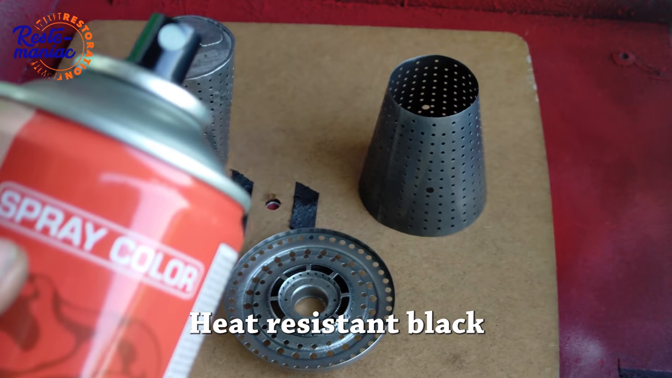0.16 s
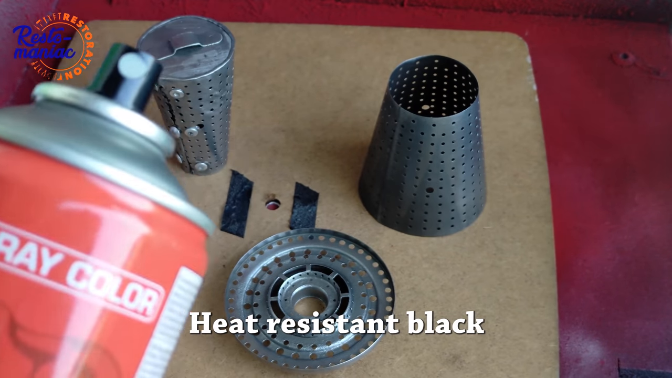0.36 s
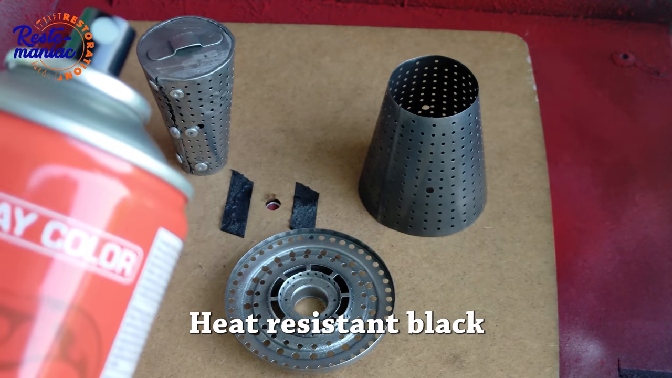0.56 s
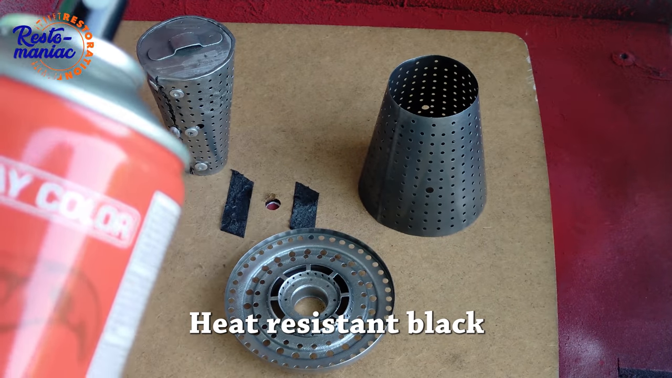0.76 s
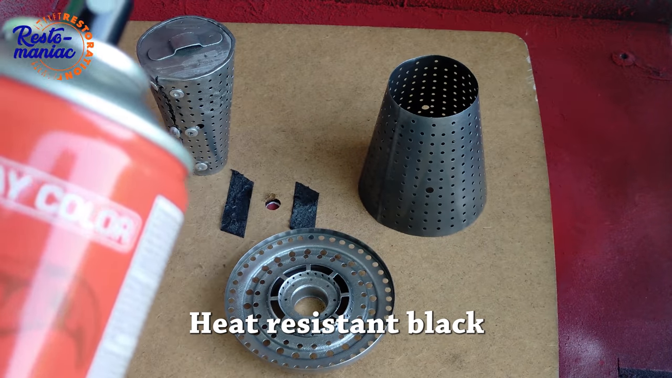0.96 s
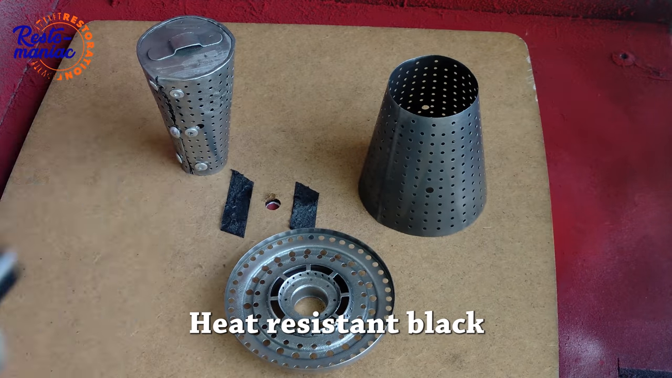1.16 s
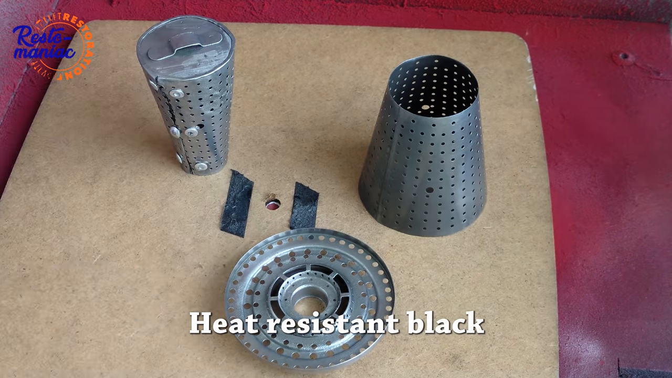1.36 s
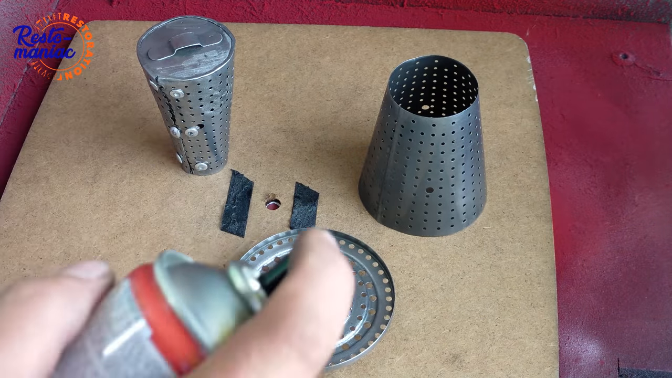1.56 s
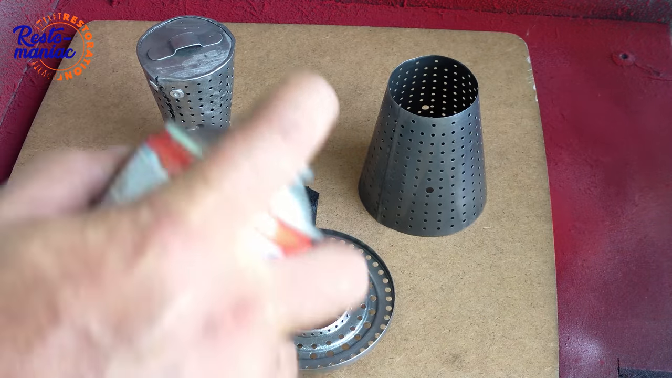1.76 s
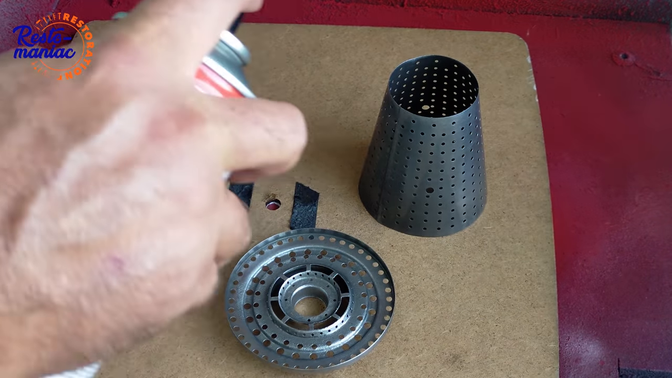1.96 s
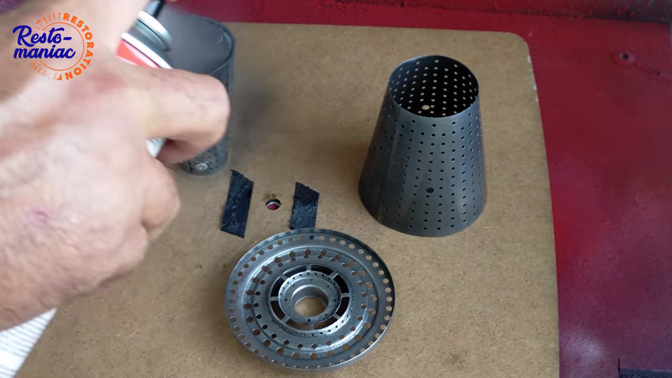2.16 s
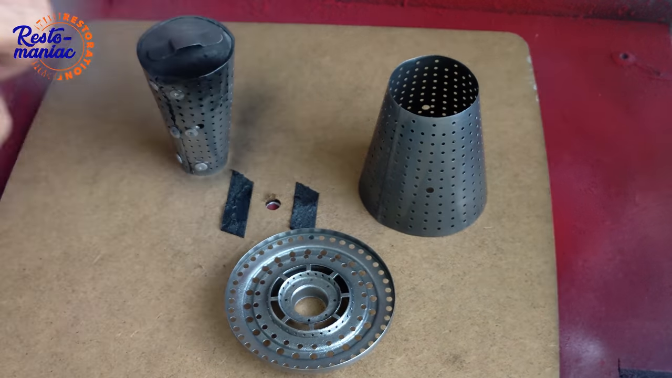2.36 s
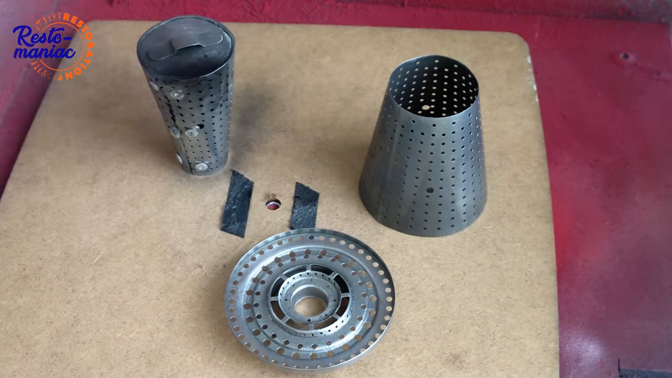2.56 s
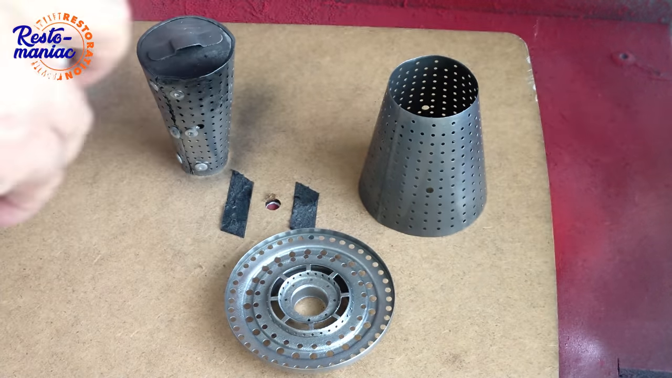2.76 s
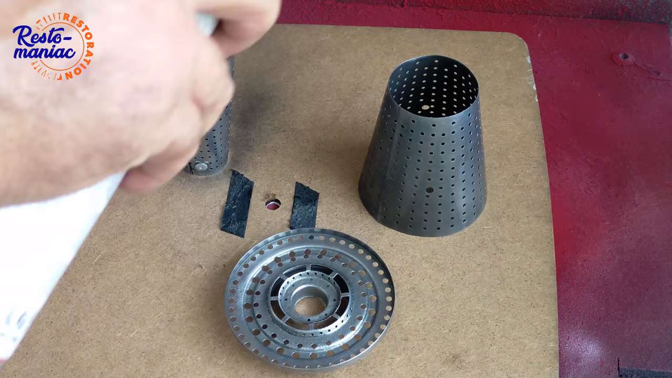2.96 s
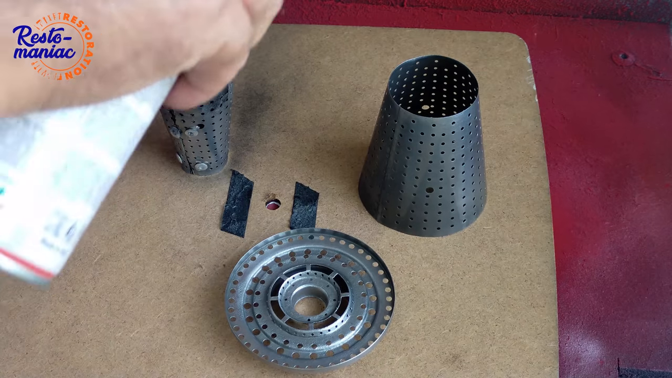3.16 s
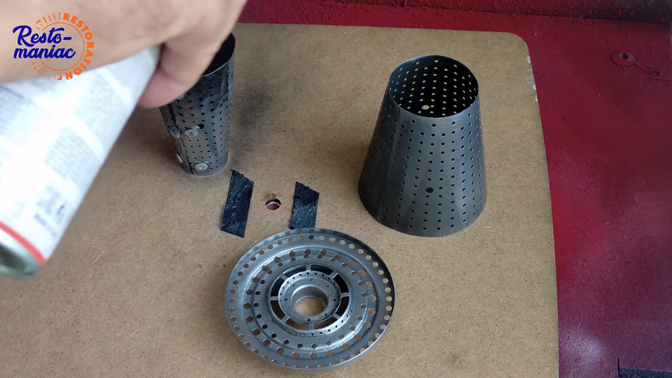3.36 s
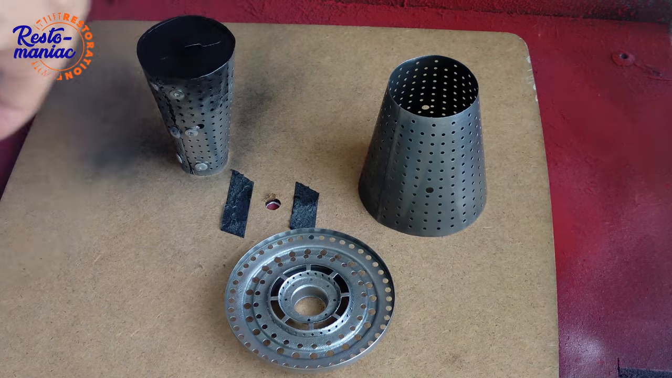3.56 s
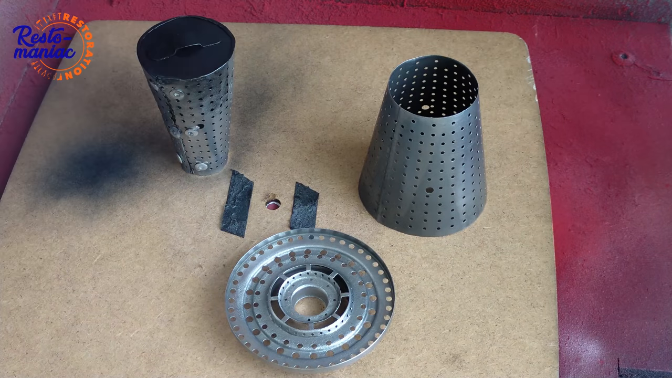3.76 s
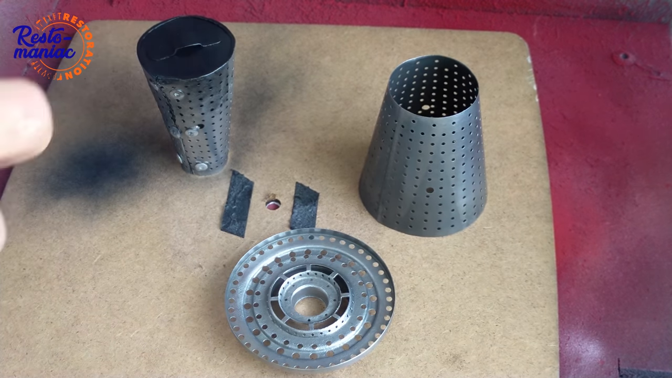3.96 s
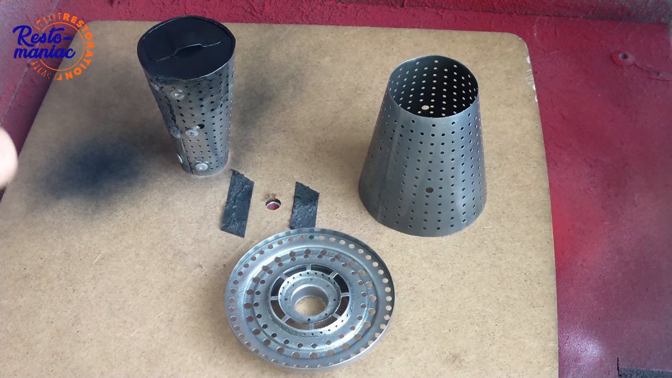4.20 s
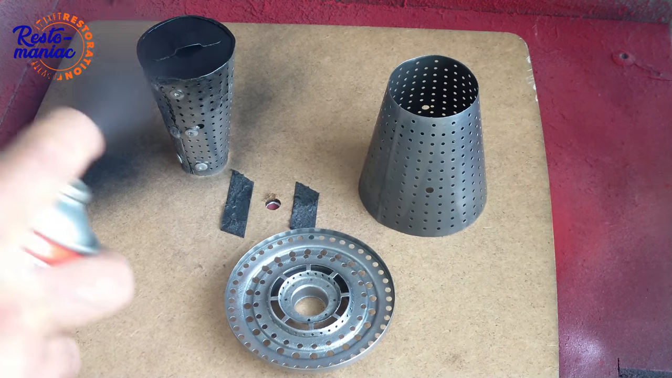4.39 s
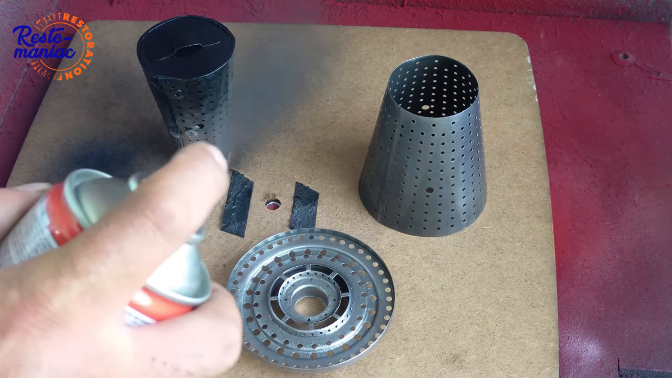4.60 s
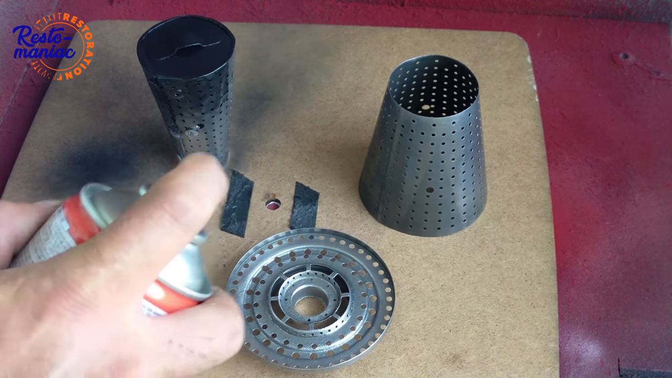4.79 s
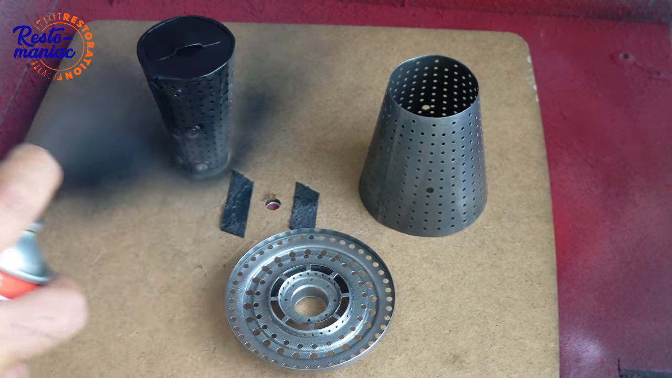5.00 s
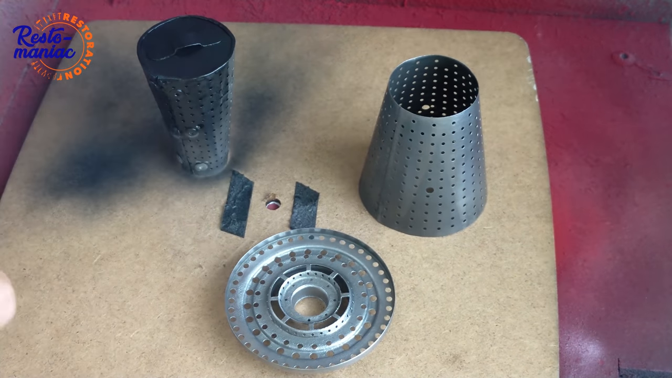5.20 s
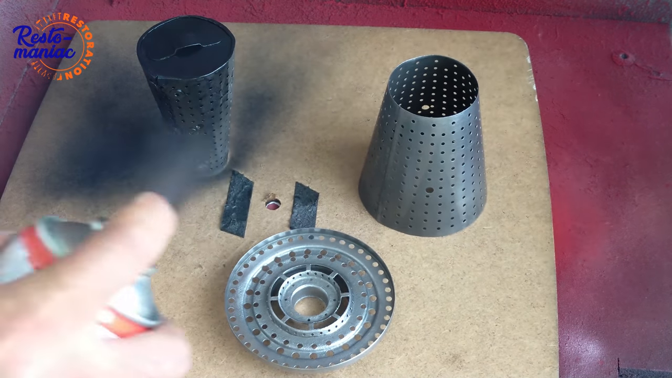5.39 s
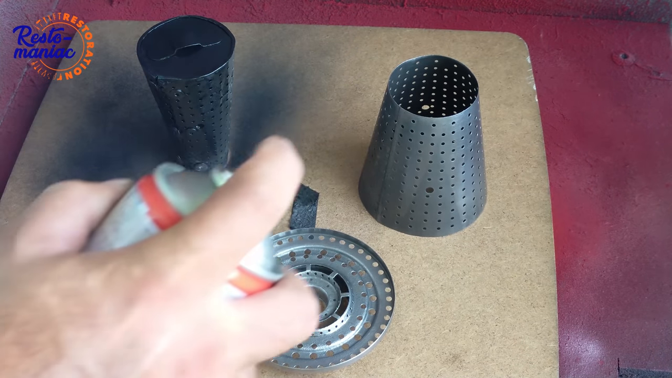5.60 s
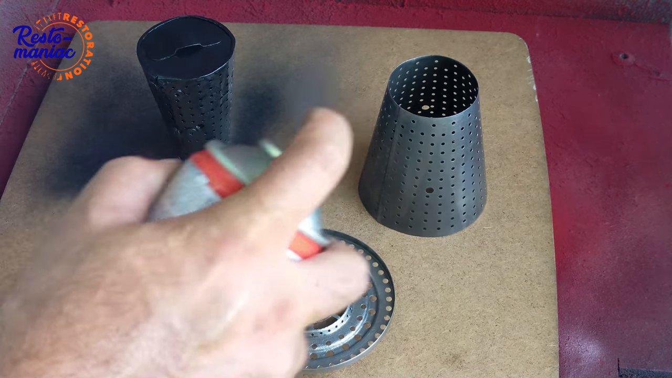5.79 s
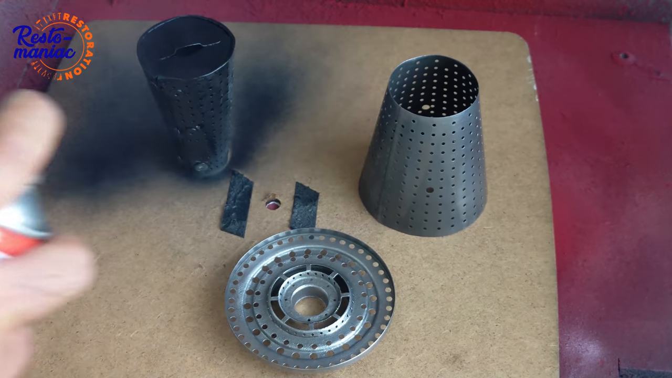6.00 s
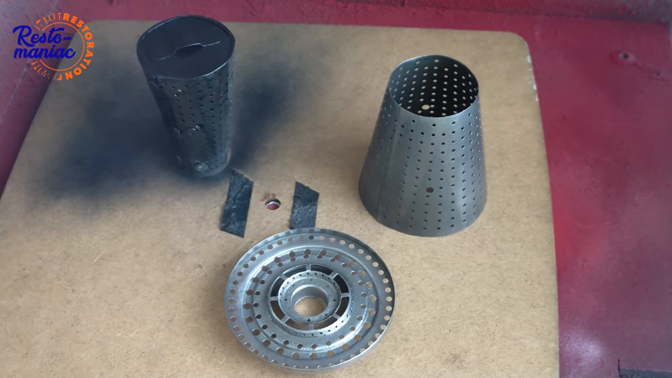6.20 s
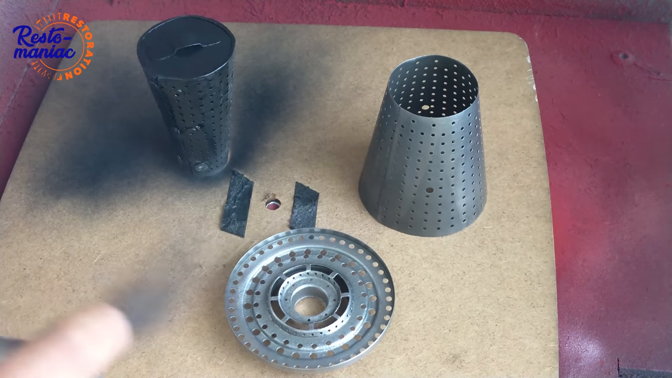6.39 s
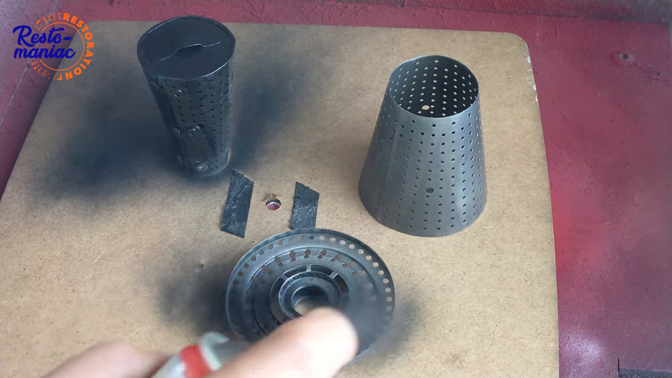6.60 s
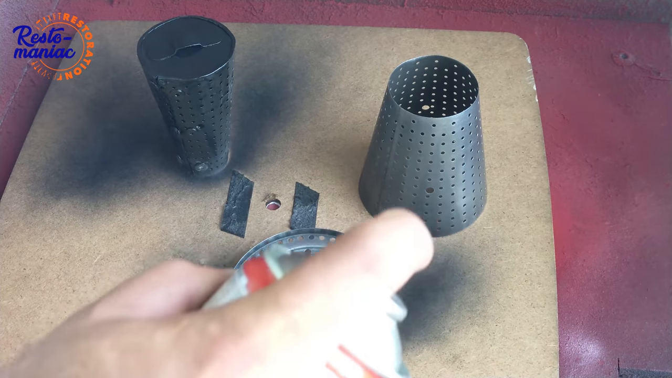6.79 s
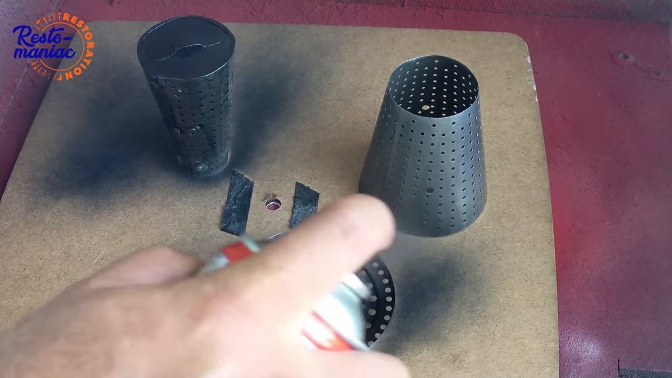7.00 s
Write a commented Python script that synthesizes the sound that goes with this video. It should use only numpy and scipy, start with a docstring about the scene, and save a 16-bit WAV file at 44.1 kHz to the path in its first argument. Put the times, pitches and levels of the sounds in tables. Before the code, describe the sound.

A small quiet workshop, heard closely by one microphone, centred, with only a short touch of room reflection. For the first two seconds there is just soft hiss and low rumble, a barely audible tick at 0.4 and a light can knock with hand movement near 1.5. From 2.0 to 2.45 the can tips and its ball rattles, a bright metallic clack at about 2.17 followed by smaller ones. Crisp spray bursts of 0.25 to 0.4 seconds start near 2.55, 3.2 and 3.8: sharp high hiss over a breathy rush, slightly hollow against metal, ending in faint fizz. Small can clicks come around 4.2 to 4.4. More bursts follow at 4.7, 5.25, 5.7, 6.2 and 6.8. Around 6.1 fingers and sleeve rub and a very thin gas whistle glides upward; soft low bumps come at 6.3 and 7.0.

```python
"""A small workshop: an aerosol can is tipped and its mixing ball rattles; eight short bursts hit metal parts.
Each press gates turbulent noise: a jet hisses high, its plume rushes lower, and delayed echoes colour both.
Metal parts resonate under the plume; decaying pops fizz after release, and a thin gas whistle glides up once.
Knocks excite damped modes of the can. Rubbing noise, bumps and stirred air follow the hand and arm,
over a quiet room hiss and rumble; one microphone feeds both channels."""
import sys
import numpy as np
from scipy import signal
from scipy.fft import rfft, irfft, next_fast_len
from scipy.io import wavfile
from scipy.ndimage import uniform_filter1d, map_coordinates

SR = 44100
rng = np.random.default_rng(int(sys.argv[2]) if len(sys.argv) > 2 else 0)


def persist_wave(psi):
    """Save psi, clipped to +-1, as 16-bit WAV."""
    counts = np.round(np.clip(psi, -1, 1) * 32767).astype(np.int16)
    wavfile.write(sys.argv[1], SR, np.atleast_2d(counts).T)


N = 310905
TIME = np.arange(N) / SR  # s


def undb(db):
    """Logarithmic level law: 20 dB is a factor of ten in amplitude."""
    return 10 ** (np.asarray(db) / 20)


def unit(x):
    """Normalisation of the root-mean-square amplitude to 1."""
    return x / np.sqrt(np.mean(x ** 2))


def colour(x, points, tilt_db=0):
    """Spectral shaping: (f/Hz, level/dB) points plus a tilt in dB per octave weight the spectrum; rms 1."""
    hz, db = np.transpose(points)
    point_octaves = np.log2(hz)
    octave = np.log2(np.maximum(np.fft.rfftfreq(len(x), 1 / SR), 1))
    level = np.interp(octave, point_octaves, db)
    level = level + tilt_db * np.maximum(octave, point_octaves[0])
    return unit(irfft(rfft(x) * undb(level), len(x)))


def noise(points):
    """Stationary random noise with the given spectrum."""
    return colour(rng.standard_normal(next_fast_len(N)), points)[:N]


def walk(rate):
    """Slow random modulation: levels held 1 / rate s and smoothed twice; rms 1."""
    size = max(int(SR / rate), 1)
    held = np.repeat(rng.standard_normal(N // size + 1), size)
    return unit(uniform_filter1d(uniform_filter1d(held, size), size)[:N])


def droplets(points, rate, spread_db):
    """Shot noise: tiny random impulses of uneven size, rate a second on average."""
    size = next_fast_len(N)
    pops = (rng.random(size) < rate / SR) * rng.standard_normal(size)
    sizes = undb(spread_db * np.minimum(rng.exponential(size=size), 4))
    return colour(pops * sizes, points)[:N]


def resonance(x, hz, width):
    """Resonance: two passes through one band-pass, each width Hz wide, select a pitch; rms 1."""
    b, a = signal.iirpeak(hz, hz / width, fs=SR)
    return unit(signal.lfilter(b, a, signal.lfilter(b, a, x)))


# presses of the valve; jet, plume and spit levels are relative, before the gains in spray:
# t/s, length/s, opening time/s, jet level/dB, jet change over the burst/dB,
# plume level/dB, plume change/dB, first spit/dB
PRESSES = [(2.552, 0.41, 0.049, -32.5, 5, -52, 3.5, 4), (3.189, 0.36, .036, -31.5, 8.5, -51, 9.5, 6),
           (3.823, .36, 0.045, -36.5, 2, -57, 4, 6.5), (4.702, 0.39, 0.075, -33.5, 3.5, -49.5, 5, 3),
           (5.261, 0.29, 0.058, -30.5, 1.5, -49, -4, 4.5), (5.717, 0.28, 0.041, -29, 0, -47, 2, 2),
           (6.203, 0.23, 0.043, -32.5, -1.5, -51, -2, 5.5), (6.784, .33, 0.055, -31, 3, -48, 1.5, 1)]
SPIT_S, SPIT_JET_SHARE = 0.02, 0.56  # paint waiting in the stem swells the plume more than the jet
EASE_S, EASE_JET_DB, EASE_PLUME_DB = 0.05, -7.5, -4.5  # the finger eases off before the valve shuts
SHUT_T60_S = 0.044


def valve_flow():
    """Flow modulation: each press opens, spits, drifts as the can sweeps, eases and decays; jet, plume gains."""
    jet, plume = np.zeros(N), np.zeros(N)
    for s, length, open_s, jet_db, jet_change_db, plume_db, plume_change_db, spit_db in PRESSES:
        age = TIME - s
        opened = np.clip(age / open_s, 0, 1)
        shutting = undb(-60 * np.maximum(age - length, 0) / SHUT_T60_S)
        valve = np.sin(np.pi / 2 * opened) ** 2 * np.sqrt(opened) * shutting
        sweep = np.clip(age / length, 0, 1) - .5
        spit = spit_db * np.exp(-((age - open_s) / SPIT_S) ** 2)
        ease = np.clip(1 + (age - length) / EASE_S, 0, 1)
        jet_level = jet_db + jet_change_db * sweep + SPIT_JET_SHARE * spit + EASE_JET_DB * ease
        plume_level = plume_db + plume_change_db * sweep + spit + EASE_PLUME_DB * ease
        jet += valve * undb(jet_level)
        plume += valve * undb(plume_level)
    return jet, plume


def off_board(x, echo_db=-12, count=10):
    """Comb interference: weak echoes off board, parts and bench; moving can and gas shift their lags."""
    out = x
    for lag_s in np.geomspace(.0007, .011, count) * rng.uniform(.85, 1.15, count):
        lag = (lag_s + .00014 * walk(5.5)) * SR  # samples
        out = out + undb(echo_db) * map_coordinates(x, [np.arange(N) - lag], order=5)
    return out / np.sqrt(1 + count * undb(echo_db) ** 2)


# nozzle hiss: f/Hz, relative density level/dB
JET_SPECTRUM = [(3000, -45), (5400, -26), (6500, -19), (7400, -18), (8250, -9.5), (9200, -15),
                (10500, -11.5), (12500, -9), (14000, -5.5), (15000, -1.5), (15650, 1.5)]
# plume of paint and gas: f/Hz, relative density level/dB
PLUME_SPECTRUM = [(100, -36), (200, -10), (320, -10.5), (520, -9.5), (800, -6.5), (1350, -5), (1600, -5.5),
                  (2200, -0.5), (2900, -2.5), (4300, -1), (5200, -12.5), (8000, -2.5), (15000, -39)]


def spray(jet_db=1, drops_db=-9.5, waver_db=0.4, flutter_db=0.91, sputter_db=1.0):
    """Turbulent jet noise: hiss, droplet pops and plume share a flow that wavers, flutters and sputters."""
    jet_gain, plume_gain = valve_flow()
    flow = undb(waver_db * walk(22) + flutter_db * walk(45) + sputter_db * walk(400))
    hiss = noise(JET_SPECTRUM)
    jet = hiss + undb(drops_db) * droplets(JET_SPECTRUM, rate=3600, spread_db=-0.5)
    plume = plume_gain * noise(PLUME_SPECTRUM)
    return off_board(flow * (undb(jet_db) * jet_gain * jet + plume))


def swells(table, grain_db):
    """Resonance under noise excitation: narrow bands swell and fade with a rough grain."""
    out, grain = np.zeros(N), undb(grain_db * walk(120))
    for s, length, db, hz, width in table:
        swell = np.sqrt(np.abs(np.sin(np.pi * np.clip((TIME - s) / length, 0, 1))))
        out += undb(db) * swell * grain * resonance(rng.standard_normal(N), hz, width)
    return out


# plume blowing into the hollow metal parts: t/s, length/s, level before grain/dB, f/Hz, filter width/Hz
HOLLOW_PARTS = [(2.58, 0.042, -57, 1730, 400), (3.34, 0.16, -60.5, 1365, 220),
                (4.92, 0.18, -60.5, 2370, 700), (5.29, 0.24, -64, 1280, 200), (5.87, 0.15, -57, 2260, 500),
                (6.24, 0.2, -57, 2350, 600), (6.88, 0.16, -62, 2150, 500)]


def hollow_parts():
    """Cavity resonance: the plume's rough air sounds the hollow metal parts."""
    return swells(HOLLOW_PARTS, grain_db=4.5)


# liquid left in the nozzle: f/Hz, relative density level/dB
FIZZ_SPECTRUM = [(300, -12), (1000, 1), (2000, -6), (2500, 5), (3100, -5), (5400, -9), (7000, -4.5),
                 (8300, 4), (9300, -7), (13000, -6), (15600, 0.5)]
# gas whistling thinly past the valve: t/s, f before wobble/Hz, level/dB
WHISTLE_GLIDE = [(6.06, 8500, -86), (6.11, 9100, -75), (6.16, 9850, -77), (6.2, 10150, -70),
                 (6.23, 10150, -80)]


def nozzle(fizz_db=-64, t60=0.97, pops_db=-5):
    """Exponential decay: noise and pops fizz out after each release; one wobbling gas tone glides up."""
    dying = 0
    for s, length, *_ in PRESSES:
        age = TIME - s - length
        dying = dying + (age > 0) * undb(-60 * np.abs(age) / t60)
    pops = droplets(FIZZ_SPECTRUM, rate=1500, spread_db=6.0)
    fizz = unit(noise(FIZZ_SPECTRUM) + undb(pops_db) * pops)
    s, hz, db = np.transpose(WHISTLE_GLIDE)
    pitch = np.interp(TIME, s, hz) * (1 + .014 * walk(900))
    whistle_gain = undb(np.interp(TIME, s, db, left=-np.inf, right=-np.inf))
    whistle = np.sin(2 * np.pi * np.cumsum(pitch) / SR) * whistle_gain
    return undb(fizz_db) * dying * fizz + whistle


# knocks and ticks of the can and its ball: t/s, level of the wall noise before its crack and high-pass/dB,
# brightness/(dB per octave), t60/s, hollow body relative to that level/dB
CAN_KNOCKS = [(0.412, -79, 2, .06, -20), (1.488, -64, -3, 0.25, -3.5), (2.041, -63, 0, 0.12, -20),
              (2.163, -41, -2.5, 0.035, 3.5), (2.175, -29, 3.1, 0.083, -15.5), (2.2457, -44, 0, 0.056, -13),
              (2.253, -41.5, 0, 0.089, -9.5), (2.3462, -41.5, -1, 0.056, -1.5),
              (2.3698, -48, -1, 0.073, -14), (2.44, -55, -1, 0.066, -5), (4.232, -62.5, 6, 0.07, -20),
              (4.405, -62, -1, .1, -14), (4.418, -50, 4, 0.098, -14), (6.702, -69.5, 4, 0.46, -18)]
# dense ring of the filled can: f/Hz, relative density level before the brightness tilt/dB
WALL_SPECTRUM = [(200, -29.5), (560, -49), (850, 0.5), (1400, -6), (2600, -3), (3400, -7.5), (4100, 1),
                 (4500, -5), (6000, -5), (8200, 3), (9500, -5.5), (13000, -8.5), (15600, -7)]
# clearest modes of the can: f/Hz, relative level before tilt and common mode gain/dB, t60/s
WALL_MODES = [(952, -7, 0.049), (1884, -0.5, 0.11), (2200, -9.5, 0.13), (3170, -5.5, 0.069),
              (3600, 0.5, 0.093), (3530, -19, 0.05), (7860, -13, 0.047), (7980, 6, 0.053), (8530, 6, 0.047)]


def rattle(modes_db=-10, crack_db=1, crack_t60=0.0017, low_hz=680):
    """Modal excitation: each blow cracks, then the can's wall rings; harder contact is brighter."""
    out, t = np.zeros(N + SR), np.arange(SR // 2) / SR
    for s, db, tilt_db, t60, _ in CAN_KNOCKS:
        decay = undb(-60 * t / t60) + undb(crack_db) * undb(-60 * t / crack_t60)
        wall = colour(rng.standard_normal(len(t)), WALL_SPECTRUM, tilt_db) * decay
        ring = np.zeros(len(t))
        for hz, mode_db, life in WALL_MODES:
            mode_gain = undb(mode_db + tilt_db * np.log2(hz / 5000) - 60 * t / life)
            ring += mode_gain * np.sin(2 * np.pi * (hz * t + rng.random()))
        start = int(s * SR)
        out[start:start + len(t)] += undb(db) * (wall + undb(modes_db) * ring)
    # so small a can radiates almost no bass
    return signal.sosfilt(signal.butter(4, low_hz, "high", fs=SR, output="sos"), out[:N])


def workshop(x, wet_db=-16, t60=0.22):
    """Reverberation: near walls add a short diffuse tail of almost flat spectrum."""
    t = np.arange(SR // 2) / SR
    diffuse = colour(rng.standard_normal(len(t)), [(1000, 0.004), (16000, 0.0054)])
    tail = diffuse * undb(-60 * t / t60) * (t > .005)
    return x + undb(wet_db) * signal.fftconvolve(x, tail / np.linalg.norm(tail))[:N]


def thuds(hits, hz):
    """Damped resonance: blows (t/s, level/dB, t60/s) gate one broad band of noise, then decay."""
    gain = np.zeros(N)
    for s, db, t60 in hits:
        age = np.maximum(TIME - s, 0)
        onset = np.minimum(age * hz / 2, 1)  # two periods
        gain += undb(db - 60 * np.minimum(age / t60, 2)) * onset
    return gain * resonance(rng.standard_normal(N), hz, hz / 3)


# hollow body of the can: f/Hz, relative level/dB, t60 as a multiple of the knock's
BODY_MODES = [(956, -10, 1.2), (1980, -7, 1.2), (3160, 0, .8), (3650, -4.5, .7)]


def can_body():
    """Cavity resonance: every knock also sounds the hollow of the can, some far more than others."""
    out = np.zeros(N)
    for hz, mode_db, life in BODY_MODES:
        hits = [(s, db + hollow_db + mode_db, t60 * life) for s, db, _, t60, hollow_db in CAN_KNOCKS]
        out += thuds(hits, hz)
    return out


# movements of the arm: start t/s, length/s, rustle level before unevenness/dB,
# stirred air level before the rumble gain in background/dB
ARM_MOVES = [(1.473, 0.36, -70, -72), (2.198, 1, -73, -68), (3.0, 0.21, -68, -66.5),
             (3.203, 1, -74.5, -68.5), (4.166, 0.46, -68, -67.5), (5.13, 1.0, -69.5, -62.5),
             (6.038, 0.3, -63.5, -63), (6.252, 0.21, -57.5, -69), (6.402, 0.37, -68, -63.5),
             (6.928, .13, -63, -72)]
HOLD_DB, STILL_AIR_DB = -87.5, -74.5  # resting levels, before those same later gains
MOVE_SKEW = 0.62  # under 1: a movement peaks before its middle


def arm():
    """Addition of powers: each movement swells and fades above rest; gains of rustle and rumble."""
    rustle, air = undb(HOLD_DB) ** 2, undb(STILL_AIR_DB) ** 2
    for s, length, rustle_db, air_db in ARM_MOVES:
        swell = np.sin(np.pi * np.clip((TIME - s) / length, 0, 1) ** MOVE_SKEW) ** 2
        rustle = rustle + swell * undb(rustle_db) ** 2
        air = air + swell * undb(air_db) ** 2
    return np.sqrt(rustle), np.sqrt(air)


# skin and sleeve: f/Hz, relative density level/dB
RUSTLE_SPECTRUM = [(30, -3.5), (70, -7.5), (140, -3.5), (200, -2), (280, -8.5), (380, -3), (520, -8),
                   (900, -8), (2300, -11.5), (5000, -23), (8300, -22), (15000, -24)]


def handling(gain, uneven_db=1.67):
    """Friction noise: skin and cloth rub unevenly as the arm moves."""
    return noise(RUSTLE_SPECTRUM) * gain * undb(uneven_db * walk(35))


# fingers and sleeve rubbing in short slips: t/s, length/s, level before grain/dB, f/Hz, filter width/Hz
RUB_SLIPS = [(0.263, 0.084, -83.5, 2960, 600), (1.112, 0.065, -80.5, 2980, 500),
             (1.927, 0.11, -77.5, 1930, 500), (3.035, .085, -73, 1090, 600), (6.063, 0.099, -63, 910, 400),
             (6.068, 0.08, -63, 1740, 260), (6.075, 0.085, -66.5, 2650, 450), (6.075, 0.2, -73, 3090, 280)]


def rubs():
    """Friction-excited resonance: short slips of fingers and sleeve sound narrow bands."""
    return swells(RUB_SLIPS, grain_db=2.5)


# bumps of the hand on the can and of the arm against the bench: t/s, level/dB, f/Hz, t60/s
HAND_BUMPS = [(1.486, -58, 1560, 0.13), (4.385, -63, 342, 0.12), (4.418, -55.5, 2130, 0.13),
              (4.449, -63, 193, 0.25), (6.12, -70.5, 206, 0.45), (6.33, -57, 214, .15),
              (6.975, -54, 195, 0.23)]


def bumps():
    """Impact excitation: the hand bumps the can, the arm bumps the bench."""
    return sum(thuds([(s, db, t60)], hz) for s, db, hz, t60 in HAND_BUMPS)


# the quiet room: f/Hz, relative density level/dB
ROOM_SPECTRUM = [(20, -3.5), (72, -4), (100, -7), (160, -19.5), (205, -15.5), (300, -21.5), (600, -24),
                 (1500, -26.5), (3000, -31.5), (5500, -42), (8400, -34.5), (9800, -42.5), (12000, -43),
                 (15500, -55)]
# low rumble of the air: f/Hz, relative density level/dB
RUMBLE_SPECTRUM = [(8, 8), (20, -3), (35, -10.5), (50, -3), (72, -5), (100, -14), (160, -26.5), (400, -43)]


def background(air, room_db=-70.5, rumble_db=6.5):
    """Ambient noise: soft room hiss over a rumble that swells when the arm stirs the air."""
    hiss = undb(room_db) * noise(ROOM_SPECTRUM)
    return hiss + air * undb(rumble_db) * noise(RUMBLE_SPECTRUM)


def scene():
    """Superposition: can, parts, hand and room add linearly, the same in both channels."""
    rustle, air = arm()
    can = workshop(spray() + hollow_parts() + nozzle() + rattle()) + can_body()
    hand = handling(rustle) + rubs() + bumps()
    mono = can + hand + background(air)
    return np.array([mono, mono])


def record(dry, top_hz=15740):
    """Band limitation: an elliptic low-pass cuts the top steeply."""
    return signal.sosfilt(signal.ellip(12, .2, 75, top_hz, fs=SR, output="sos"), dry)


dry = scene()
out = record(dry)
persist_wave(out)
```